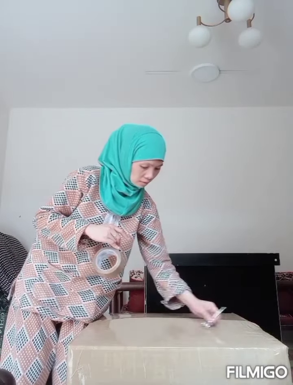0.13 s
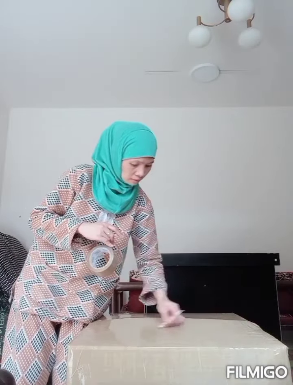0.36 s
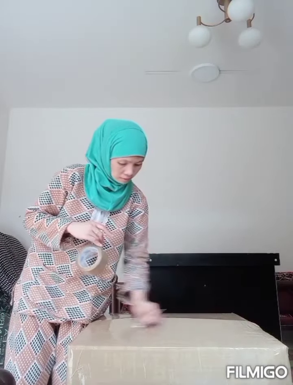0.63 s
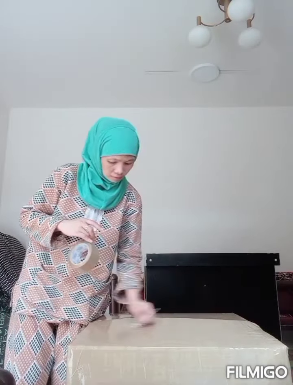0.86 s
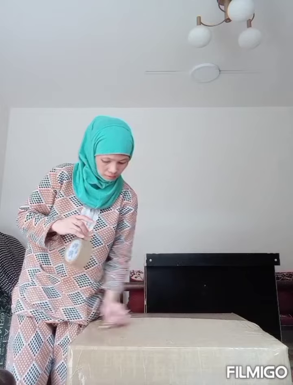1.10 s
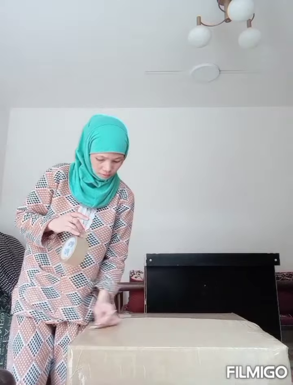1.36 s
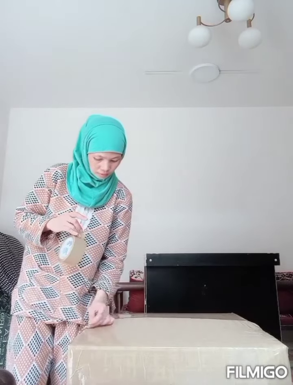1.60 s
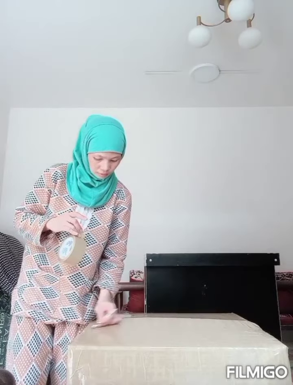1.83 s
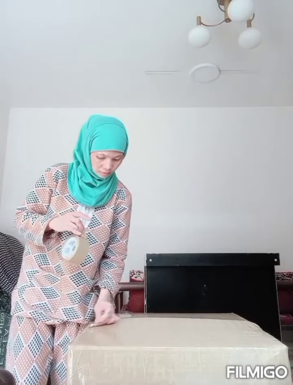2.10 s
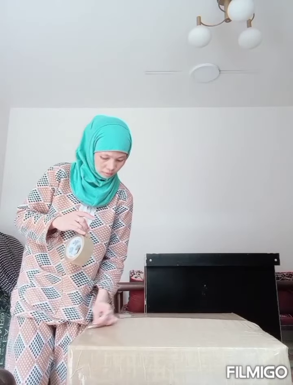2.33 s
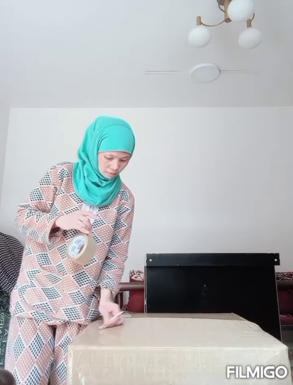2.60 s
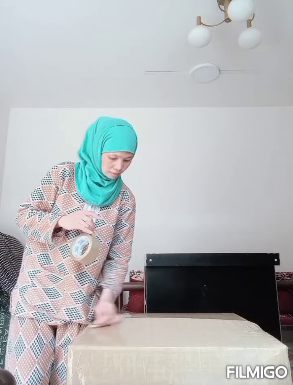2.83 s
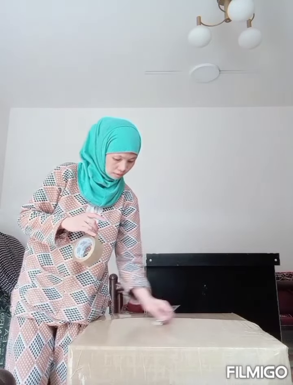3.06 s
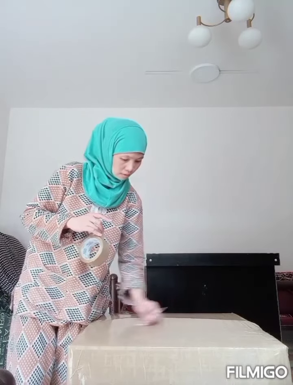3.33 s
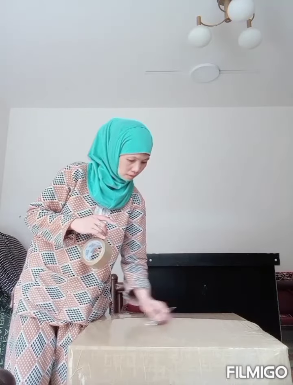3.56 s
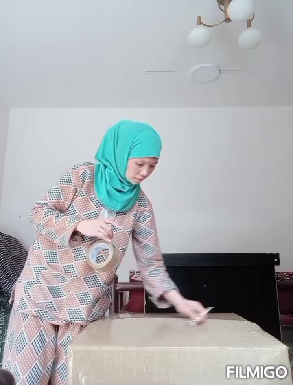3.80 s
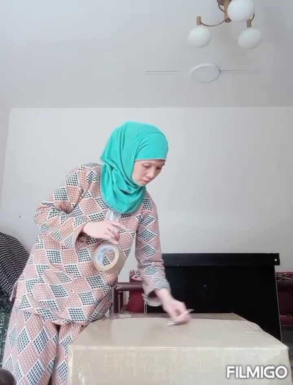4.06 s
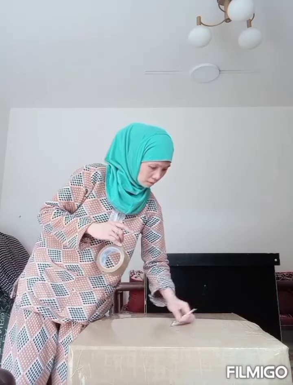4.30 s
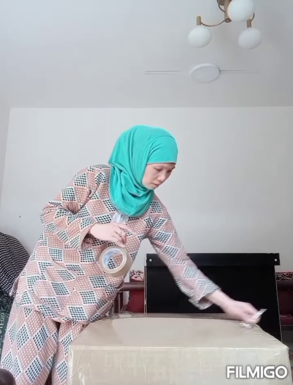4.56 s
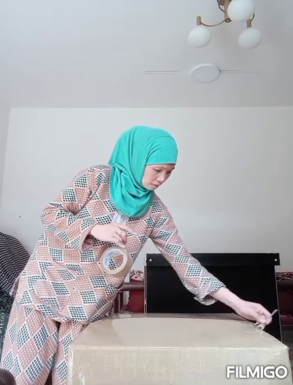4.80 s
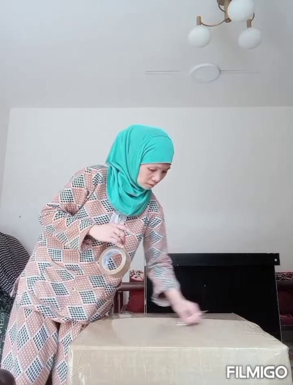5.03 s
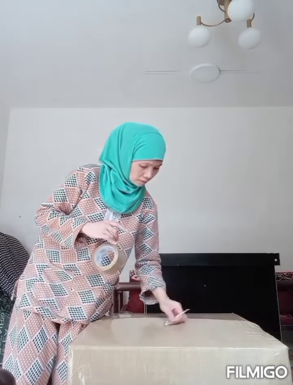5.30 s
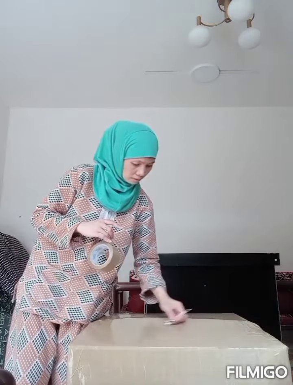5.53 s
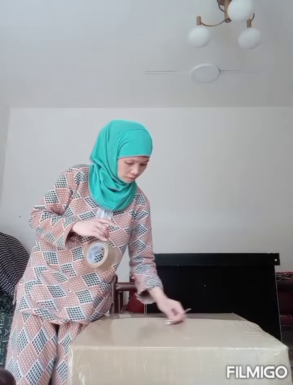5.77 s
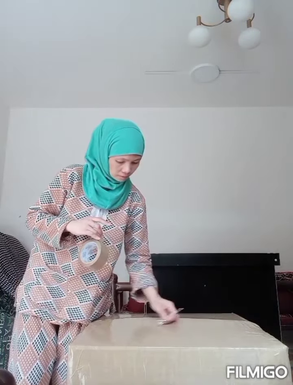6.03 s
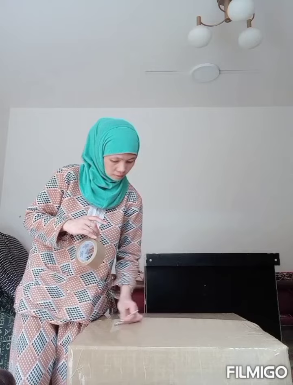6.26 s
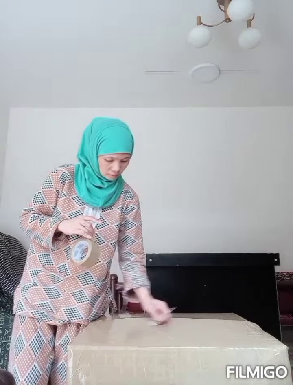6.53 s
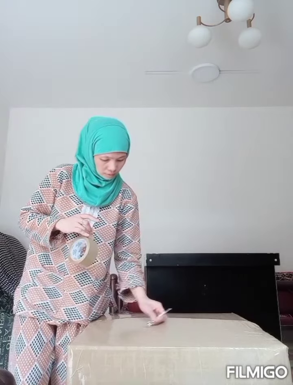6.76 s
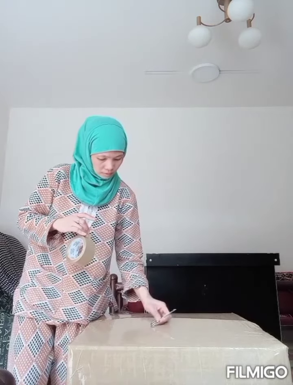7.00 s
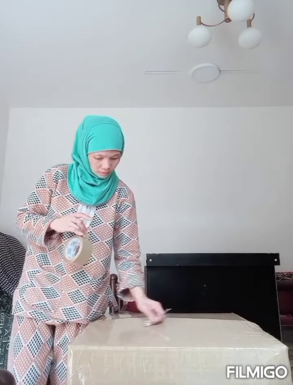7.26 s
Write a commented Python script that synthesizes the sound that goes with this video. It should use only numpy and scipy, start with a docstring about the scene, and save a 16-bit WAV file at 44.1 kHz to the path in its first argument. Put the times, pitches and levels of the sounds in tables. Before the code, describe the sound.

A hand rubs packing tape onto a big hollow cardboard box, close by in a bare room. Fast strokes hum and rumble with a papery hiss and small tape ticks, then nearly stop for over a second with only faint touches. Strong strokes return, a bright tape snap cracks out, and the rubbing ends lighter and more uneven. A low room tone lies beneath.

```python
"""Friction rumbles in a corrugated cardboard box and hisses on packing tape, as a hand presses the tape down
with quick strokes in a bare room. Loose tape crackles and snaps as it sticks; jolts ring the panel.
Fingers crossing the ridges of the board make it hum at the crossing rate. Noise and clicks are the friction,
two-pole resonances are the box, feedback delays are the room; a low room tone lies beneath."""
import sys
import numpy as np
from scipy import signal
from scipy.fft import rfft, irfft, next_fast_len
from scipy.io import wavfile
from scipy.ndimage import uniform_filter1d

SR = 44100
rng = np.random.default_rng(int(sys.argv[2]) if len(sys.argv) > 2 else 0)


def boost_factor(decibels):
    """Convert a level in decibels to a linear amplitude factor."""
    exponent = np.asarray(decibels, float) / 20
    return 10 ** exponent


def master(y):
    """Save y as 16-bit WAV."""
    cut = np.clip(np.atleast_2d(y).T, -1, 1)
    pcm = np.round(cut * 32767)  # scale
    wavfile.write(sys.argv[1], SR, pcm.astype(np.int16))


N = 325458
TIME = np.arange(N) / SR


def rms_one(x):
    """Scale to unit rms."""
    return x / np.sqrt(np.mean(x ** 2) + 1e-20)


def band(x, low_hz, high_hz):
    """Butterworth band-pass."""
    return signal.sosfilt(signal.butter(2, [low_hz, high_hz], "band", fs=SR, output="sos"), x)


def drift(per_s):
    """Slow random wander, unit rms: noise through a double one-pole low-pass."""
    r = np.exp(-2 * np.pi * per_s / SR)
    noise = rng.standard_normal(N + SR)
    return rms_one(signal.lfilter([1], [1, -2 * r, r * r], noise)[SR:])


def grains(per_s, spread_db):
    """Random clicks of uneven size and sign."""
    sizes = boost_factor(spread_db * np.minimum(rng.exponential(1, N), 4))
    signs = rng.choice([-1, 1], N)
    return sizes * signs * (rng.random(N) < per_s / SR)


def coloured(x, spectrum, patchy_db=0):
    """Shape x by a spectrum joined on a log axis, to unit rms; narrow patches may flicker on their own."""
    hz, db = np.transpose(spectrum)
    octave = np.log2(np.arange(1, N // 2 + 2) * SR / N)
    shaped = rfft(x) * boost_factor(np.interp(octave, np.log2(hz), db))
    if not patchy_db:
        return rms_one(irfft(shaped, N))
    step = 0.125
    out = 0
    for centre in np.arange(9.2, 14.2, step):      # log2 Hz
        weight = np.clip(1 - abs(octave - centre) / step, 0, 1)
        out = out + irfft(shaped * weight, N) * boost_factor(patchy_db * drift(16))
    return rms_one(out)


def swells(top_s, rise_s, fall_s, top_db, roundness):
    """Level in dB of swells that rise to a top and fall away; their powers add."""
    depth_db = 20              # drop one rise before and one fall after the top
    rise_extra_roundness = 0.21      # a hand lands more abruptly than it lets go
    t = TIME[::32, None] - top_s
    along = np.where(t < 0, -t / np.maximum(rise_s, 1e-3), t / np.maximum(fall_s, 1e-3))
    drop_db = depth_db * np.minimum(along, 5) ** (roundness + rise_extra_roundness * (t < 0))
    power = (boost_factor(top_db - drop_db) ** 2).sum(axis=1)
    return np.interp(TIME, TIME[::32], 10 * np.log10(power + 1e-14))


# passes of the hand, times before lead and stretch; the first row is no pass, only a short burst right at the
# start: # (top_s, rise_s, fall_s, hum_db, rumble_db, hiss_db, treble_db)
PASSES = [(-0.0, 0.08, 0.038, -35, -39, -53.5, -85), (0.069, 0.044, 0.062, -43, -45.5, -63, -71.5),
          (0.196, 0.039, 0.21, -28.5, -37.5, -39.5, -62), (0.332, 0.2, 0.065, -23.5, -35, -51, -68),
          (0.514, 0.11, 0.113, -27.5, -36.5, -44.5, -73), (0.726, 0.076, 0.11, -22, -41, -46.5, -70),
          (0.881, 0.075, 0.092, -34.5, -42, -57.0, -77), (1.047, 0.061, 0.096, -22.5, -40, -44.5, -64.0),
          (1.123, 0.094, 0.11, -27, -37.5, -46.5, -67), (1.325, 0.07, 0.1, -31.5, -38.5, -48.5, -69),
          (1.533, 0.079, 0.12, -25, -36, -43.0, -63.5), (1.709, 0.088, 0.062, -69, -56.5, -73.0, -79),
          (1.857, 0.054, 0.074, -47, -47.5, -61.5, -74), (1.982, 0.04, 0.069, -66.0, -64, -75, -83),
          (2.089, 0.065, 0.052, -57.5, -62.5, -75, -85), (2.186, 0.05, 0.14, -56.0, -60.5, -68.5, -74.5),
          (2.321, 0.057, 0.052, -61.5, -57.5, -71, -80), (2.437, 0.051, 0.095, -68, -66, -82.0, -83.5),
          (2.532, 0.041, 0.047, -67, -58.5, -75.0, -84), (2.64, 0.071, 0.075, -83, -62.5, -77.5, -81),
          (2.738, 0.025, 0.075, -59.5, -58.5, -69, -78), (2.862, 0.031, 0.075, -74, -54.5, -73.5, -82),
          (2.956, 0.016, 0.072, -78, -53.5, -70.5, -88), (3.095, 0.058, 0.051, -79, -58, -68.5, -76.5),
          (3.184, 0.039, 0.079, -51, -45.5, -59, -76), (3.287, 0.019, 0.078, -59, -82.0, -62.5, -66),
          (3.413, 0.11, 0.11, -29.5, -36.5, -44.5, -65), (3.634, 0.1, 0.11, -26.0, -40.0, -47.0, -71),
          (3.846, 0.1, 0.13, -30.5, -36.0, -45.0, -73), (4.03, 0.068, 0.094, -29.5, -36.5, -48.0, -72.0),
          (4.215, 0.086, 0.16, -38, -39, -48.5, -67), (4.279, 0.13, 0.064, -31, -42.5, -51, -96.0),
          (4.441, 0.074, 0.114, -31.5, -44.0, -58.0, -75), (4.593, 0.047, 0.099, -39, -41.5, -57.0, -66.5),
          (4.737, 0.052, 0.12, -34.5, -46.5, -65.5, -78), (4.891, 0.061, 0.18, -34.5, -45.5, -54, -67.5),
          (4.985, 0.1, 0.11, -35, -39, -46.5, -68), (5.095, 0.028, 0.054, -46.0, -48.5, -57.5, -62),
          (5.29, 0.081, 0.067, -65.5, -102.0, -94.0, -108.0), (5.341, 0.02, 0.091, -78, -56.5, -66, -52.0),
          (5.454, 0.11, 0.15, -25.5, -48, -50.5, -80), (5.651, 0.081, 0.1, -44.5, -55.5, -61, -71),
          (5.748, 0.041, 0.089, -33, -47.5, -61.5, -75), (5.875, 0.082, 0.12, -47.5, -50.5, -66.5, -71),
          (6.025, 0.06, 0.11, -35, -48, -64.0, -73), (6.136, 0.045, 0.082, -52, -57.0, -66.5, -71.5),
          (6.28, 0.05, 0.12, -36.5, -45.5, -55.0, -67.5), (6.439, 0.042, 0.051, -42.5, -46, -56.5, -71),
          (6.579, 0.039, 0.079, -37.5, -53, -58.0, -84.0), (6.638, 0.082, 0.14, -36.5, -43.5, -54.0, -66.5),
          (6.861, 0.13, 0.087, -39.5, -43.5, -56.0, -76), (7.044, 0.054, 0.11, -34.0, -45.5, -56, -70.5),
          (7.205, 0.077, 0.054, -46.0, -50, -67.5, -73), (7.328, 0.04, 0.103, -65, -67, -87, -92)]


def pass_levels():
    """Each pass swells in hum, rumble, hiss and treble; the panel is loaded just before the skin slips."""
    hum_lead_s, rumble_lead_s = 0.024, 0.0095
    top_s, rise_s, fall_s, hum_top, rumble_top, hiss_top, treble_top = np.transpose(PASSES)
    hum_db = swells(top_s - hum_lead_s, 0.99 * rise_s, 0.96 * fall_s, hum_top, 1.82)
    rumble_db = swells(top_s - rumble_lead_s, 0.97 * rise_s, 0.97 * fall_s, rumble_top, 1.68)
    hiss_db = swells(top_s, rise_s, fall_s, hiss_top, 1.79)
    treble_db = swells(top_s, 1.17 * rise_s, 1.17 * fall_s, treble_top, 1.79)
    return hum_db, rumble_db, hiss_db, treble_db


# strokes across the ridges; end_s may cut a stroke before top_s, or drop it if before start_s:
# (start_s, top_s, end_s, top_ridge_rate_hz, end_slowing_0_to_1, octave_db re fundamental)
STROKES = [(.14, 0.263, 0.355, 292.8, 0.55, -8), (0.417, 0.497, 0.59, 243.5, 0.37, -8.5),
           (0.631, 0.71, 0.76, 239.5, 0.47, -7.5), (0.815, 0.865, 0.89, 164.1, 0.28, 2),
           (0.969, 1.067, 1.18, 243.2, 0.48, -10), (1.262, 1.315, 1.356, 222.1, 0.39, -17),
           (1.453, 1.522, 1.595, 238.2, 0.42, -17), (1.807, 1.853, 1.9, 107.6, 0.07, -16),
           (3.142, 3.162, 3.27, 110.7, 0.12, -14), (3.29, 3.409, 3.45, 241.5, 0.42, -15.5),
           (3.53, 3.619, 3.69, 238.1, .45, -18), (3.76, 3.836, 3.9, 228.1, 0.31, -5),
           (3.96, 4.027, 4.05, 190.2, .35, -16), (4.144, 4.229, 4.3, 205.1, 0.36, 2),
           (4.384, 4.443, 4.55, 147.3, 0.2, -1), (4.563, 4.599, 4.75, 147.2, 0.09, -1.5),
           (4.69, 4.724, 4.75, 133, 0.26, -6), (4.828, 4.916, 5.05, 185.8, 0.39, -2.5),
           (5.221, 5.27, 5.2, 203, 0.01, -24), (5.324, 5.442, 5.8, 220.5, 0.35, -14),
           (5.52, 5.602, 5.63, 216.9, 0.05, -7), (5.709, 5.74, 5.77, 125.1, 0.11, -5),
           (5.818, 5.888, 5.97, 160.5, 0, -5), (5.979, 6.021, 5.98, 115, 0.04, -3),
           (6.1, 6.132, 6.17, 175.6, 0.02, 11), (6.233, 6.262, 6.28, 135.1, .2, -12),
           (6.4, 6.44, 6.6, 140.6, 0.23, -3.5), (6.54, 6.622, 6.69, 176, 0.2, -9.5),
           (6.768, 6.846, 7.25, 180.7, .4, -14), (6.981, 7.045, 7, 154.4, 0.29, -7),
           (7.147, 7.205, 7.24, 111.3, 0.2, 4)]


def stroke_motion():
    """Ridge rate follows hand speed, an arch per stroke; share is the part of the low sound that hums."""
    clear_share, hum_arch_db = 0.96, 2.5      # the hum is weaker at the slow ends
    rate_hz, share = np.full(N, 100.), np.zeros(N)
    octave_db, arch_db = np.zeros(N), np.zeros(N)
    for start_s, top_s, end_s, top_hz, slowing, second_db in STROKES:
        inside = (TIME >= start_s) & (TIME < end_s)
        t = TIME[inside] - top_s
        along = np.where(t < 0, t / (top_s - start_s), t / (end_s - top_s))
        rate_hz[inside] = top_hz * (1 - slowing * along ** 2)
        share[inside] = clear_share * np.minimum(1, 9 * (1 - abs(along)))
        octave_db[inside] = second_db
        arch_db[inside] = -hum_arch_db * along ** 2
    rate_hz, share, octave_db = uniform_filter1d([rate_hz, share, octave_db], size=301)  # a hand cannot jump
    return rate_hz, np.clip(share, 0, 1), octave_db, arch_db


# room tone spectrum, relative: (freq_hz, level_db_per_hz)
ROOM_TONE = [(18, -58), (30, -17), (70, 5), (199, 5), (554, -31), (721, -27), (889, -28.5), (1040, -20),
             (16000, -49.5)]


def room_tone():
    """Steady, mostly low noise of the room."""
    return boost_factor(-67) * coloured(rng.standard_normal(N), ROOM_TONE)


BOX_BROAD_DB = -13.5
# panel and air modes: (freq_hz, width_hz, gain_db)
BOX = [(109.3, 12, -5.5), (164, 38, -2), (216.3, 28.3, 0.5), (290.6, 21.8, 3), (324.4, 28.5, 0),
       (414.3, 28.4, 0), (483, 15, -6.5), (523.6, 22, -3.5), (613.4, 24.4, -7.5), (692.3, 19.2, -2),
       (793, 25, -14), (827.5, 20, -9), (919, 40, -13), (1005, 17, -7), (1101, 7.9, -8.5), (1158, 52, -11),
       (1364, 6.6, -4)]


def box_modes():
    """Each mode as a two-pole resonance (b, a); neighbours alternate in sign."""
    for k, (hz, width_hz, db) in enumerate(BOX):
        r = np.exp(-np.pi * width_hz / SR)
        gain = (-1) ** k * boost_factor(db) * (1 - r * r) / 2
        yield gain * np.array([1, 0, -1]), [1, -2 * r * np.cos(2 * np.pi * hz / SR), r * r]


def box(force, wander_db=0):
    """The panel answers a force with modes over a broad response; a moving hand couples to each unevenly."""
    out = boost_factor(BOX_BROAD_DB) * force
    for b, a in box_modes():
        coupling = boost_factor(wander_db * drift(6.9)) if wander_db else 1
        out = out + signal.lfilter(b, a, force * coupling)
    return out


def rumble(hum_db, rumble_db, left):
    """Rough friction shakes the panel modes, which ring on: low lumps and a middle roar."""
    lumps_db, roar_db = 2.5, 5      # gain from friction to the panel's answer
    lumps = rms_one(band(rng.standard_normal(N), 86, 327))
    rough = signal.lfilter([1], [1, -.9], grains(4000, 1.87))
    roar = rms_one(band(rough, 348, 1140))
    force = boost_factor(hum_db + lumps_db) * np.sqrt(left) * lumps
    force = force + boost_factor(rumble_db + roar_db + 0.99 * drift(33)) * roar
    return box(force, wander_db=3.0)


# fingers on tape, relative: (freq_hz, level_db_per_hz)
HISS = [(650, -47), (1100, -1.5), (1470, -6), (1950, -8), (2760, -4), (3190, -1.5), (3860, -3),
        (4410, -7.5), (5400, -19.5), (6110, -22), (6680, -16), (7640, -26.5), (9770, -34), (13200, -29.5),
        (16000, -41.5)]


def hiss(hiss_db):
    """Dense fine grains of skin slipping on the tape."""
    level = boost_factor(hiss_db + 0.65 * drift(60))
    return level * coloured(grains(7000, 3.77), HISS, patchy_db=2.5)


def room(x):
    """Ten feedback delays, duller on every round."""
    t60_s, wall_cut_hz = 0.2, 11000
    size = next_fast_len(N + SR)
    turn = np.exp(-2j * np.pi * np.arange(size // 2 + 1) / size)      # one sample of delay
    dull = np.exp(-2 * np.pi * wall_cut_hz / SR)
    wall = (1 - dull) / (1 - dull * turn)
    answer = 0
    for k, lag in enumerate((rng.uniform(.012, .04, 10) * SR).astype(int)):
        loop = boost_factor(-60 * lag / SR / t60_s) * wall * turn ** lag
        answer = answer + (-1) ** k * loop / (1 - loop)
    return irfft(rfft(x, size) * answer, size)[:N]


# crackle spectrum, relative: (freq_hz, level_db_per_hz)
CRACKLE = [(880, -56), (1500, -16), (3350, -5), (3620, 0), (5540, -5), (6690, 4), (8160, -5), (10000, -8),
           (12700, -1), (14200, -4), (16000, -7)]
# flurries where loose tape is pressed down: (top_s, fall_s, level_db)
FLURRIES = [(.164, .05, -58), (.687, 0.03, -58), (1.053, .04, -63), (1.339, .04, -67), (2.092, 0.085, -61),
            (2.738, .04, -83), (3.28, 0.039, -69), (3.45, .03, -62), (3.665, 0.019, -66), (4.147, .03, -68),
            (4.973, 0.029, -64), (5.085, 0.036, -54), (5.335, 0.074, -49.5), (5.65, .03, -72),
            (5.916, 0.031, -73), (6.023, .03, -64), (6.171, 0.027, -77), (7.018, .03, -69)]


def crackle(hiss_db, treble_db):
    """Loose tape ticks in clumps wherever the treble rises above plain friction, and in sudden flurries."""
    friction_db = -22      # treble of plain friction re hiss
    top_s, fall_s, db = np.transpose(FLURRIES)
    excess = np.sqrt(np.maximum(boost_factor(2 * treble_db) - boost_factor(2 * (hiss_db + friction_db)), 0))
    flurry_db = swells(top_s, 0.015, fall_s, db, roundness=1.3)
    ticks = grains(6000 * boost_factor(3.4 * drift(59)), 4.2)
    return np.hypot(excess, boost_factor(flurry_db)) * coloured(ticks, CRACKLE)


# fingers catching on a seam or tapping the board: (start_s, level_db before push gain)
JOLTS = [(0.063, -34), (0.672, -36), (0.726, -27), (0.85, -35), (0.997, -33), (1.463, -42), (1.819, -40),
         (2.042, -39.5), (2.293, -54), (2.508, -63), (2.717, -44), (2.856, -41), (2.947, -56), (3.043, -49),
         (3.167, -37), (3.376, -34), (3.558, -32.5), (4.564, -37), (4.69, -47), (4.748, -43), (4.82, -43),
         (5.58, -45), (5.723, -38), (5.975, -40), (6.229, -41), (6.556, -42), (6.594, -27), (6.987, -51),
         (7.148, -48)]


def jolts():
    """A soft, short push that sets the panel modes ringing."""
    push_gain_db = 29
    start_s, db = np.transpose(JOLTS)
    push = np.full(N, 1e-18)
    push[(start_s * SR).astype(int)] = boost_factor(db + push_gain_db)
    return box(band(push, 250, 900))


def ridge_hum(hum_db, rate_hz, share, octave_db, arch_db):
    """Ridge crossings drive the box at multiples of their rate; the hum partly follows the modes it sweeps."""
    wobble, flutter_db, scatter_rad = 0.0118, 1.57, 0.62
    third_db, fourth_db = -17, -26      # re fundamental
    follows_modes = 0.22      # 0 = level ignores the modes, 1 = follows fully
    phase = 2 * np.pi * np.cumsum(rate_hz * (1 + wobble * drift(40.0))) / SR      # unevenly spaced ridges
    grid_hz = np.arange(20, 1500, 4.)
    modes = sum(signal.freqz(b, a, grid_hz, fs=SR)[1] for b, a in box_modes())
    answer = abs(boost_factor(BOX_BROAD_DB) + modes) ** 2
    answer = uniform_filter1d(answer, size=7)      # a quick glide only samples the modes broadly
    force, power = 0, 0
    for k, db in enumerate([0, octave_db, third_db, fourth_db], 1):
        level = boost_factor(db + flutter_db * k * drift(23))
        force = force + level * np.cos(k * phase + (k - 1) * scatter_rad * drift(22.4))
        power = power + boost_factor(2 * np.asarray(db)) / 2 * np.interp(k * rate_hz, grid_hz, answer)
    power = power * (np.median(power) / power) ** follows_modes
    return box(force * boost_factor(hum_db + arch_db) * np.sqrt(share / power))


# snaps of tape sticking down: (start_s, peak_db, centre_hz, t60_s)
SNAPS = [(0.165, -47, 5100, .04), (0.191, -39, 6400, 0.034), (.685, -42.5, 12800, 0.074),
         (1.002, -41, 3850, 0.03), (1.056, -42, 12610, .03), (1.148, -36.5, 4030, 0.034),
         (1.342, -46, 12550, .03), (1.475, -43.5, 6403, .05), (1.526, -38.5, 6547, .04),
         (2.09, -52, 13000, 0.06), (2.738, -63, 12000, 0.059), (3.177, -64, 4024, .03),
         (3.272, -57, 6570, .05), (3.281, -60, 9000, .04), (3.443, -46, 12550, .03),
         (3.619, -41.5, 5960, .04), (3.666, -63, 12000, .03), (4.962, -43.5, 6690, .04),
         (4.972, -53, 12370, 0.045), (5.085, -39.5, 13130, .05), (5.1, -47, 11970, 0.027),
         (5.325, -43, 11970, 0.021), (5.332, -28.5, 12580, .02), (5.3398, -38, 7000, 0.022),
         (5.3386, -31, 12480, .02), (5.3444, -40, 6700, .03), (5.591, -59, 13070, .03),
         (5.641, -51, 3960, 0.14), (5.646, -52.5, 6510, 0.14), (5.647, -55, 12600, 0.045),
         (5.648, -43.5, 1240, 0.07), (5.911, -49.5, 6275, 0.12), (6.02, -55, 7000, .04),
         (6.165, -57, 6500, .05), (6.5583, -48, 3970, .04), (7.018, -58, 9100, 0.039)]


def snaps():
    """Each snap is a click with a dying burst of noise, around a pitch of its own."""
    sharpness, length = 4.6, 6000      # Q of each resonance, samples
    out, t = np.zeros(N + length), np.arange(length) / SR
    for start_s, db, hz, t60_s in SNAPS:
        r = np.exp(-np.pi * hz / sharpness / SR)
        a = [1, -2 * r * np.cos(2 * np.pi * hz / SR), r * r]
        rattle = 6 * t60_s * rng.standard_normal(length)      # long snaps are more rattle than click
        burst = (rattle + (t == 0) * 3) * boost_factor(-60 * t / t60_s)
        for _ in range(2):      # twice through keeps the snap within its band
            burst = signal.lfilter([1, 0, -1], a, burst)
        first = int(start_s * SR)
        out[first:first + length] += boost_factor(db) * burst / abs(burst).max()
    return out[:N]


def scene():
    """The box close by, its echoes and the room tone."""
    hum_db, rumble_db, hiss_db, treble_db = pass_levels()
    rate_hz, share, octave_db, arch_db = stroke_motion()
    near = rumble(hum_db, rumble_db, 1 - share) + hiss(hiss_db)
    near = near + crackle(hiss_db, treble_db) + jolts()
    near = near + ridge_hum(hum_db, rate_hz, share, octave_db, arch_db) + snaps()
    return (near + boost_factor(-16) * room(near) + room_tone())[None]


def low_pass(x):
    """Removes everything above the highest recorded frequency."""
    return signal.sosfilt(signal.butter(12, 16420, fs=SR, output="sos"), x)


def record(dry):
    """A small microphone loses the deep bass; the top is cut."""
    mic_cut_hz, top_cut_hz = 59, 16350
    x = signal.sosfilt(signal.butter(3, mic_cut_hz, "high", fs=SR, output="sos"), dry)
    x = signal.sosfilt(signal.cheby2(14, 60, top_cut_hz, fs=SR, output="sos"), x)
    return low_pass(x)


dry = scene()
out = record(dry)
master(out)
```